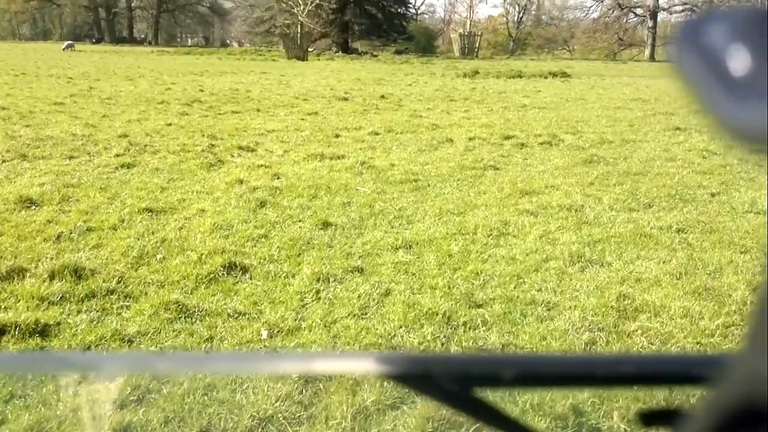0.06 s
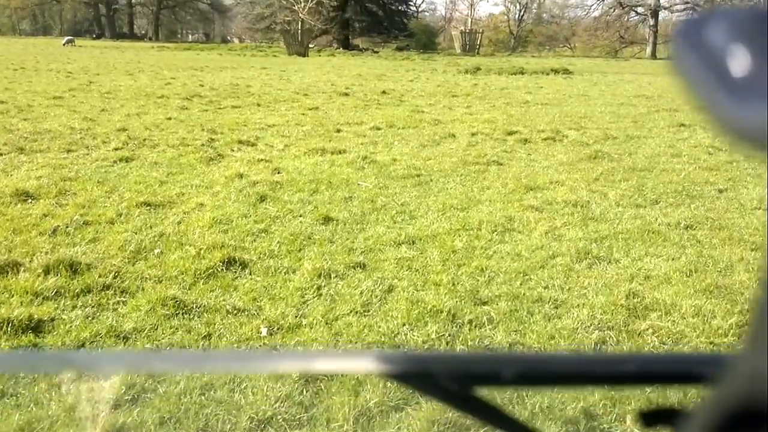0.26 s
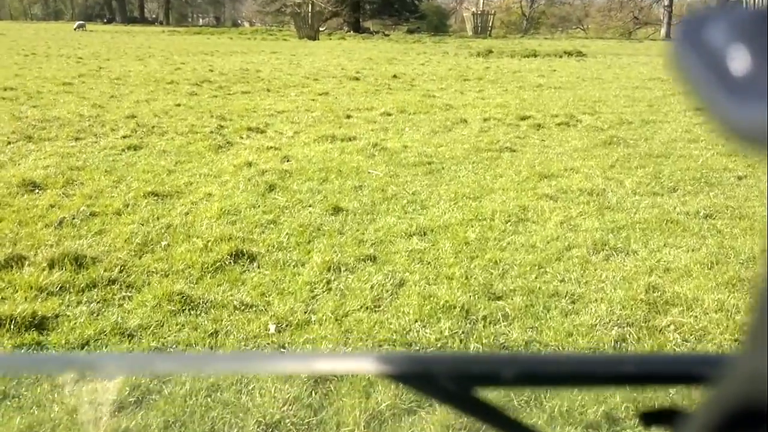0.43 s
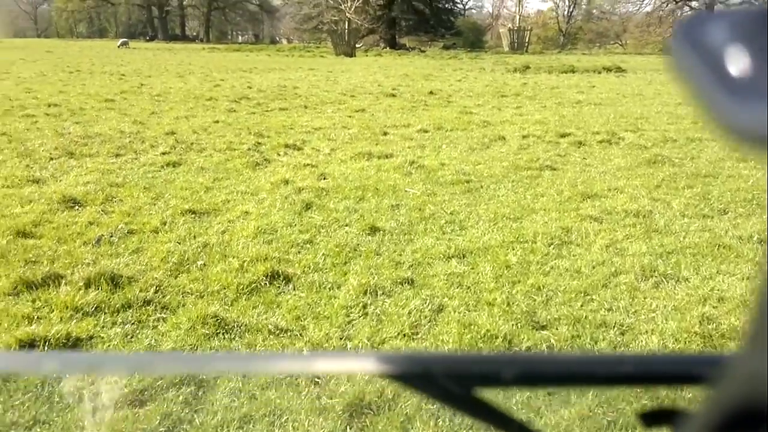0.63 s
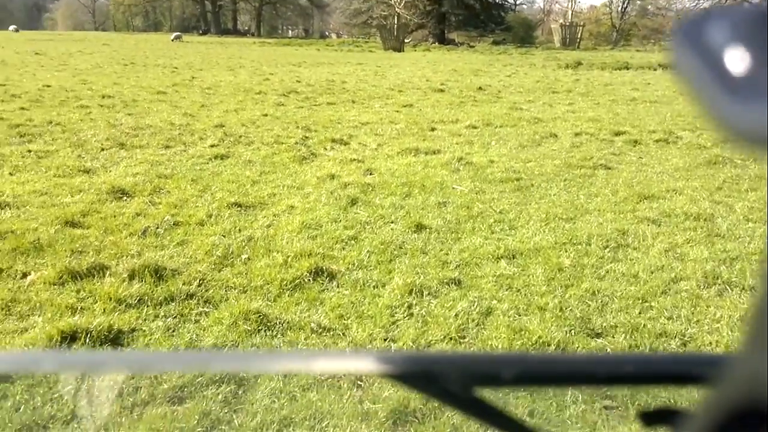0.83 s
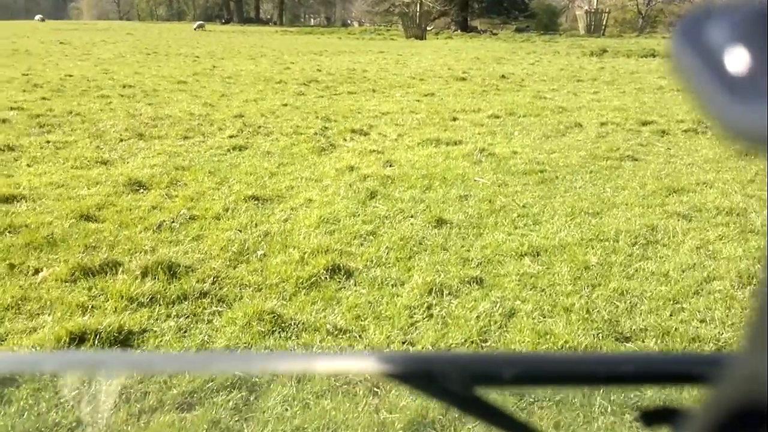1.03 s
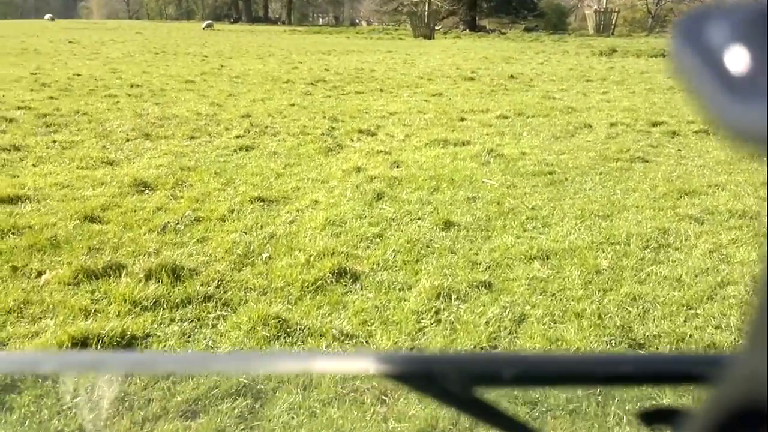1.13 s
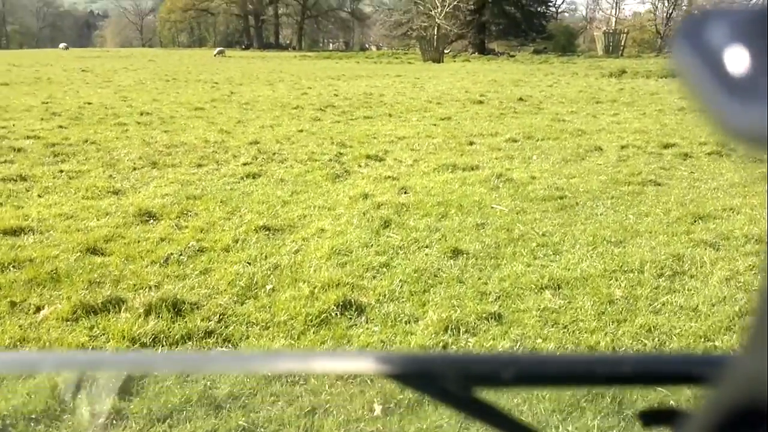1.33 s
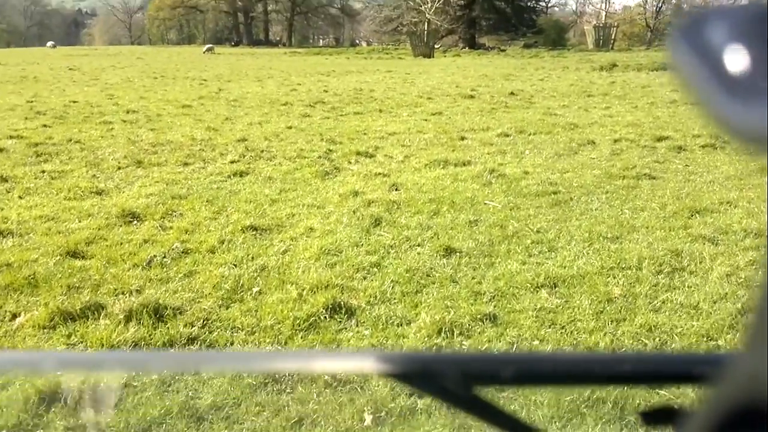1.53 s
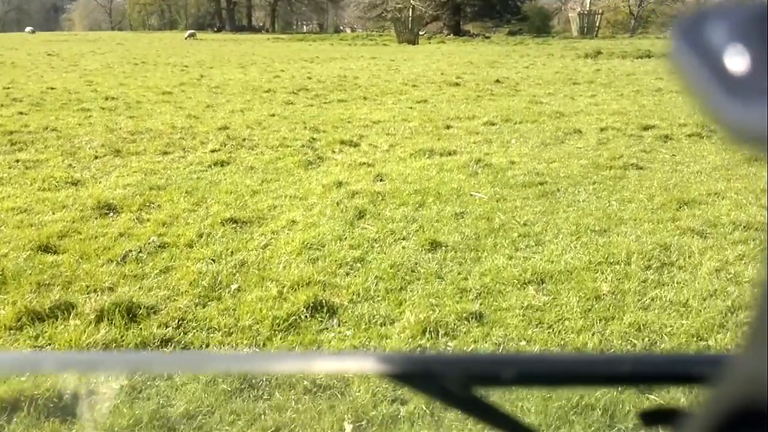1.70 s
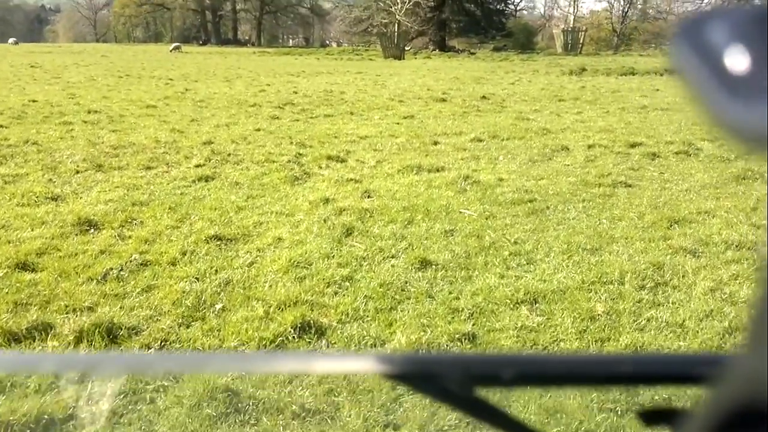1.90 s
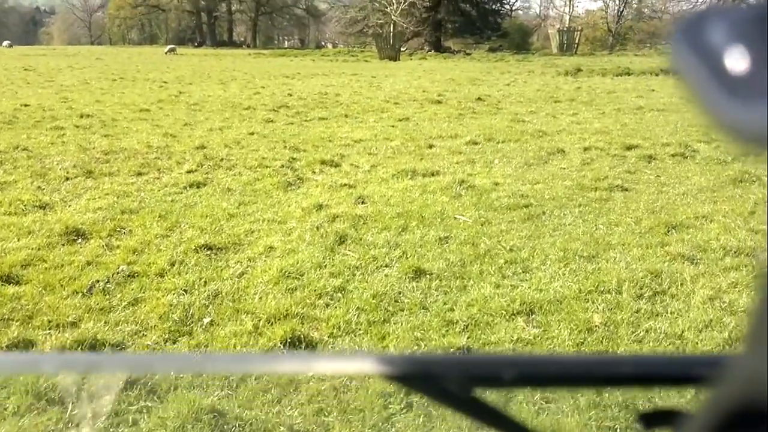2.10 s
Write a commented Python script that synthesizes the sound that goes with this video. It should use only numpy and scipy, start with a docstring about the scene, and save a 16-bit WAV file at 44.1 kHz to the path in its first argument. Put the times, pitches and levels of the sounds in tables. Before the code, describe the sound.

A sheep bleats once, thin and reedy, after gusts of wind buffet the microphone.

```python
"""An open pasture on a breezy day. Gusts buffet the two microphone ports and eddies thump the right one,
over a soft rush of air. A far bird whistles; light knocks and faint hisses sound nearby.
Then comes one long, thin, reedy bleat close by: sharp pulses ring a bright resonance at 3-4 kHz,
scoop up in pitch and waver with the effort."""
import sys
import numpy as np
from scipy import signal
from scipy.fft import rfft, irfft, next_fast_len
from scipy.io import wavfile
from scipy.ndimage import uniform_filter1d

SR = 44100
rng = np.random.default_rng(int(sys.argv[2]) if len(sys.argv) > 2 else 0)


def generate_wav(signal):
    """Clip the signal to [-1, 1] and save it as 16-bit WAV at the path in sys.argv[1]."""
    frames = np.transpose(np.atleast_2d(signal))
    scaled = np.clip(frames, -1, 1) * 32767
    pcm = np.round(scaled).astype(np.int16)
    wavfile.write(sys.argv[1], SR, pcm)


N = 94815
T = np.arange(N) / SR


def from_db(db):
    return 10 ** (np.asarray(db) / 20)


def rms_one(x):
    return x / np.sqrt(np.mean(x ** 2) + 1e-20)


def in_time(points):
    """A curve of (s, value) points at every sample."""
    return np.interp(T, *np.transpose(points))


def bin_gains(colour, size):
    """Gain per FFT bin from (Hz, dB) points, joined over log frequency."""
    hz, db = np.transpose(colour)
    bin_hz = np.maximum(np.arange(size // 2 + 1) * SR / size, 1)
    return from_db(np.interp(np.log(bin_hz), np.log(hz), db))


def coloured(x, colour):
    """Minimum-phase filter; output at rms 1."""
    size = 2 * next_fast_len(N // 2 + 4096)
    cepstrum = irfft(np.log(bin_gains(colour, size)))
    cepstrum[1:size // 2] *= 2
    cepstrum[size // 2 + 1:] = 0
    return rms_one(irfft(rfft(x, size) * np.exp(rfft(cepstrum)))[..., :N])


def shaded(x, colour):
    """Zero-phase filter."""
    return irfft(rfft(x, 2 * N) * bin_gains(colour, 2 * N))[:N]


def noise(colour):
    return coloured(rng.standard_normal(N), colour)


def drift(rate_hz):
    """Smooth random wander at rms 1."""
    lowpass = signal.butter(2, rate_hz, fs=SR, output="sos")
    return rms_one(signal.sosfilt(lowpass, rng.standard_normal(N)))


def evened(x, span_s):
    """Hold the short-term rms at 1."""
    width = max(int(span_s * SR), 2)
    power = uniform_filter1d(uniform_filter1d(x ** 2, width), width)
    return x / np.sqrt(np.abs(power) + 1e-9)


def delayed(x, lag_s):
    return np.interp(T - lag_s, T, x, left=0)


def panned(db):
    """Left gain up by db, right gain down."""
    return from_db([[db], [-db]])


def swell(peak_s, rise_s, fall_s):
    """A lopsided bell of height 1."""
    spread_s = np.where(T < peak_s, rise_s, fall_s)
    return np.exp(-np.minimum(((T - peak_s) / spread_s) ** 2, 200) / 2)


def swelling_db(rows, lull_db):
    """Power sum of a lull and swells of (peak s, spread s, dB)."""
    power = sum((from_db(db) * swell(s, spread_s, spread_s)) ** 2 for s, spread_s, db in rows)
    return 10 * np.log10(from_db(lull_db) ** 2 + power)


def port_wind():
    """Low turbulence buffets each port; strong gusts add a higher crumple."""
    # Each row: peak in seconds, spread in seconds, left and right strength in dB.
    gusts = [(.01,0.031,-38.5,-42), (0.166,0.027,-34,-56), (0.228,0.04,-34,-26), (0.424,0.046,-33.5,-13.5),
             (0.533,0.022,-35,-14), (0.608,0.01,-27,-21), (0.716,0.056,-33.5,-19.5), (0.902,0.035,-32,-18),
             (1.01,0.032,-31.5,-51), (1.102,0.098,-36.5,-28.5), (1.276,0.031,-29.5,-18.5),
             (1.417,0.038,-33.5,-31.5), (1.5,0.019,-55,-16.5), (1.582,0.024,-33.5,-17),
             (1.635,0.034,-30,-25), (1.673,0.015,-36.5,-31), (1.87,0.018,-46.5,-20.5),
             (1.932,0.038,-35.5,-30), (2.122,0.036,-32.5,-67)]
    # Turbulence spectra. Each row: frequency in Hz, relative level in dB.
    buffet_colour = [(12,-21.5),(25,5.5),(40,2),(70,-1),(100,-4.5),(140,-26.5),(200,-27.5),(300,-35),(600,-51.5),(5000,-105)]
    crumple_colour = [(40,-23.5),(80,-4.5),(140,11),(200,-2.5),(280,-21),(450,-23.5),(1000,-38.5),(3000,-68),(12000,-89)]
    strong_gust_db, crumple_growth = -6, 0.86
    ports = []
    for side, lull_db in enumerate((-48, -50.5)):
        gust_db = swelling_db([(s, spread_s, db[side]) for s, spread_s, *db in gusts], lull_db)
        crumple_db = -22.5 + crumple_growth * (gust_db - strong_gust_db)
        crumple = from_db(crumple_db) * evened(noise(crumple_colour), span_s=.035)
        buffet = from_db(gust_db + 3.5) * evened(noise(buffet_colour), span_s=.035)
        ports.append(buffet + crumple)
    return np.array(ports)


def air():
    """A swelling rush, louder on the left, over the steady hush of the field."""
    # Each row: peak in seconds, spread in seconds, strength in dB.
    rushes = [(.18,0.041,-56.5), (.42,0.054,-50.5), (.6,0.035,-52.5), (.71,0.059,-56), (.91,0.032,-48),
              (1.2,0.28,-58.5), (1.4,0.023,-50), (1.625,0.02,-45), (1.75,0.29,-56.5), (2.13,0.0069,-44)]
    # Each row of both spectra: frequency in Hz, relative level in dB.
    rush_colour = [(100,-20),(220,7),(340,10.5),(500,3.5),(650,3.5),(830,0.5),(1100,-9),(1500,-18),(2200,-36),(4000,-48.5),(8000,-46.5),(16000,-68)]
    hush_colour = [(60,6.5),(400,-20),(1000,-19.5),(2000,-12),(4000,-19),(8000,-25),(15000,-29)]
    rush_db = swelling_db(rushes, lull_db=-64.5) + 2
    mid = noise(rush_colour)
    side = 0.12 * noise(rush_colour) * np.array([[1], [-1]])
    hush = np.array([noise(hush_colour), noise(hush_colour)])
    return from_db(rush_db) * panned(4.5) * (mid + side) + from_db(-70) * hush


def bird():
    """Faint, far whistles, each a gliding sine."""
    # Each row: start and length in seconds, start and end pitch in Hz, level in dB.
    whistles = [(-.03, 0.19, 2370, 2340, -80.5), (.589, .11, 4720, 5550, -78.5)]
    out = np.zeros(N)
    for start_s, length_s, start_hz, end_hz, db in whistles:
        progress = np.clip((T - start_s) / length_s, 0, 1)
        hz = start_hz + (end_hz - start_hz) * progress
        out += from_db(db) * np.sin(np.pi * progress) * np.sin(2 * np.pi * np.cumsum(hz) / SR)
    return out


def knocks():
    """Each light knock is a short crack and a few damped modes."""
    # Each row: start in seconds, gain in dB, pan in dB, low-mode boost in dB.
    hits = [(.17, -51, 1.5, 9.5), (.899, -60.5, -1.5, 15.5), (1.05, -44.5, 5, 0), (1.3, -61.5, 4, 7.5)]
    # Each row: frequency in Hz, relative level in dB, T60 in seconds.
    modes = [(340,7.5,0.049),(544,4,0.036),(640,-6,0.061),(817,-11,0.41),(1000,-7.5,0.023),(1343,-13,0.094),(1782,-22.5,0.16)]
    # Each row: frequency in Hz, relative level in dB.
    crack_colour = [(300,-5.5),(800,20.5),(1800,5),(3000,-9.5),(5200,-15.5),(7000,-37.5),(12000,-65.5)]
    crack_db, crack_t60_s, low_below_hz = -6, 0.097, 700
    out = np.zeros((2, N))
    for start_s, db, pan_db, boost_db in hits:
        age_s = np.maximum(T - start_s, 0)
        ring = np.zeros(N)
        for hz, mode_db, t60_s in modes:
            decay = from_db(mode_db + boost_db * (hz < low_below_hz) - 60 * age_s / t60_s)
            ring += decay * np.sin(2 * np.pi * hz * age_s) * rng.choice([-1, 1])
        crack = noise(crack_colour) * from_db(crack_db - 60 * age_s / crack_t60_s) * (age_s > 0)
        out += from_db(db) * panned(pan_db) * (ring + crack)
    return out


def hisses():
    """Faint hisses, squeaks and rustles: short swells of band-limited noise."""
    # Each row: start and length in seconds, centre and width in Hz, level and pan in dB.
    bursts = [(0.211, 0.036, 1700, 600, -68.5, 7), (1.386, 0.12, 3580, 3620, -70.5, 5),
              (1.404, 0.047, 4700, 250, -74, 5), (1.455, 0.0079, 3470, 600, -49, 6),
              (2.018, 0.31, 14450, 2364, -63.5, -7)]
    out = np.zeros((2, N))
    for start_s, length_s, hz, width_hz, db, pan_db in bursts:
        band = signal.butter(3, [hz - width_hz / 2, hz + width_hz / 2], "band", fs=SR, output="sos")
        hiss = rms_one(signal.sosfilt(band, rng.standard_normal(N)))
        arch = np.sin(np.pi * np.clip((T - start_s) / length_s, 0, 1))
        out += from_db(db) * panned(pan_db) * arch * hiss
    return out


def thumps():
    """An eddy crossing the port gives one push and one pull."""
    # Each row: centre in seconds, peak level in dB, main frequency in Hz.
    eddies = [(0.354,-19.5,130), (0.445,-12,106.8), (.456,-4,90.7), (0.486,-10,93.8), (0.523,-9,88),
              (0.6,-19.5,113.7), (0.724,-12.5,85), (1.131,-16,62.5), (1.591,-4.5,55.2), (1.672,-9.5,41.6),
              (1.865,-12,48.4), (1.89,-16,43.97)]
    out = np.zeros(N)
    for centre_s, db, hz in eddies:
        angle = 2 * np.pi * hz * (T - centre_s)
        out -= from_db(db) * angle * np.exp(.5 - np.minimum(angle ** 2, 200) / 2)
    return out


def bleat():
    """One sharp pulse a cycle rings the throat: tight and raspy, then clear, quavering with effort."""
    # Scoop up to the held pitch. Each row: time in seconds, pitch in Hz.
    scoop = [(1.478,197.9),(1.51,220.4),(1.523,219.1),(1.56,240.8),(1.6,243.6)]
    # Surges of effort. Each row: peak, rise and fall in seconds, pitch lift in Hz, effort lift in dB.
    surges = [(1.488,0.006,0.026,1.3,4), (1.584,0.025,0.044,4,5), (1.665,0.034,0.053,9.5,5.5),
              (1.82,0.031,0.05,8.5,2), (1.964,0.0194,0.051,10.5,3), (2.16,0.024,0.036,11,5.5)]
    # Throat resonances. Each row: frequency in Hz, relative level in dB.
    low_colour = [(250,-17),(500,-25),(750,-15),(1000,-6),(1250,-12),(1500,-16.5),(1760,-10),(2010,-3.5),(2260,-5),(2500,3.5),(3000,-76.5)]
    tight_colour = [(1500,-41),(2700,-15.5),(3230,0),(3500,-7.5),(3850,-4),(4100,0),(4330,-15),(5000,-27.5),(5300,-37),(8000,-40.5),(10000,-66.5)]
    bright_colour = [(1800,-29.5),(2260,-16.5),(2500,-3),(2750,-4),(3020,2.5),(3270,4),(3520,3.5),(3790,0.5),(4050,-1),(4280,-9),(4550,-44.5),(5200,-63.5),(6700,-78)]
    treble_colour = [(3800,-25),(4500,-10),(4830,-7.5),(5070,-12.5),(5330,-27),(5800,-31),(6700,-37),(8500,-71.5),(11000,-86)]
    top_colour = [(4500,-27),(6900,-16.5),(7650,9),(8300,-11),(13000,-32)]
    # Noise between the low partials, same columns.
    hoarse_colour = [(1100,-2),(2600,2.5),(6000,-40)]
    # Course of the faint top resonance. Each row: time in seconds, relative level in dB.
    top_curve = [(1.5,-82), (1.57,-82.5), (1.62,-74), (1.7,-71.5), (1.75,-80), (1.96,-76.5), (2.09,-80.5)]
    start_s, attack_s, fade_db_per_s = 1.4637, .007, 7.5
    jitter, shimmer_db, rasp_settle_s = .002, .4, .05
    low_build_s, relax_at_s, relax_s = .065, 1.51, .02
    treble_growth, close_at_s, close_db_per_s = 1.9, 2.06, 107

    age_s = np.maximum(T - start_s, 0)
    pitch_hz = in_time(scoop)
    effort_db = -fade_db_per_s * age_s
    for peak_s, rise_s, fall_s, lift_hz, lift_db in surges:
        surge = swell(peak_s, rise_s, fall_s)
        pitch_hz += lift_hz * surge
        effort_db += lift_db * surge

    phase = 2 * np.pi * np.cumsum(pitch_hz * (1 + jitter * drift(100))) / SR
    phase -= np.interp(start_s, T, phase)  # open on a pulse
    pulses = rms_one(sum(np.cos(k * phase) for k in range(1, 54))) * from_db(shimmer_db * drift(150))
    rasp = rms_one(rng.standard_normal(N) * (1 + np.cos(phase)) ** 2)
    voice = pulses + rasp * from_db(-24 + 11 * np.exp(-age_s / rasp_settle_s))
    hoarse_voice = voice + from_db(-16) * noise(hoarse_colour)
    raspy_voice = voice + from_db(-11) * rasp

    relaxed = .5 + .5 * np.tanh((T - relax_at_s) / relax_s)
    treble_db = -54.5 + treble_growth * effort_db - close_db_per_s * np.maximum(T - close_at_s, 0)
    bands = ((hoarse_voice, low_colour, from_db(-37.5 - 10.5 * np.exp(-age_s / low_build_s))),
             (voice, tight_colour, from_db(-30.5 + effort_db) * np.sqrt(1 - relaxed)),
             (voice, bright_colour, from_db(-31.5 + effort_db) * np.sqrt(relaxed)),
             (raspy_voice, treble_colour, from_db(treble_db)),
             (raspy_voice, top_colour, from_db(5 + in_time(top_curve))))
    call = sum(gain * evened(coloured(drive, colour), span_s=.053) for drive, colour, gain in bands)
    return call * np.minimum(age_s / attack_s, 1)


def at_ports(call):
    """Each port adds one close reflection; the right hears the call later and duller."""
    # Left, then right. Each row: delay in seconds, relative amplitude.
    reflections = [(0.002163, 0.23), (0.001342, 0.16)]
    # Each row: frequency in Hz, gain in dB.
    right_shade = [(1200,-1),(1760,-7.5),(2260,1),(4350,0.5),(5100,-19),(7500,-16.5)]
    left, right = (call + share * delayed(call, lag_s) for lag_s, share in reflections)
    right = shaded(delayed(right, lag_s=.00023), right_shade)
    return panned(.1) * np.array([left, right])


def scene():
    """All sources at the left and right ports."""
    wind = port_wind()
    wind[1] += thumps()
    return wind + at_ports(bleat()) + hisses() + air() + knocks() + bird()


def record(dry):
    """Steep low-pass, 70 dB down from 15.7 kHz."""
    return signal.sosfilt(signal.cheby2(12, 70, 15700, fs=SR, output="sos"), dry)


dry = scene()
out = record(dry)
generate_wav(out)
```